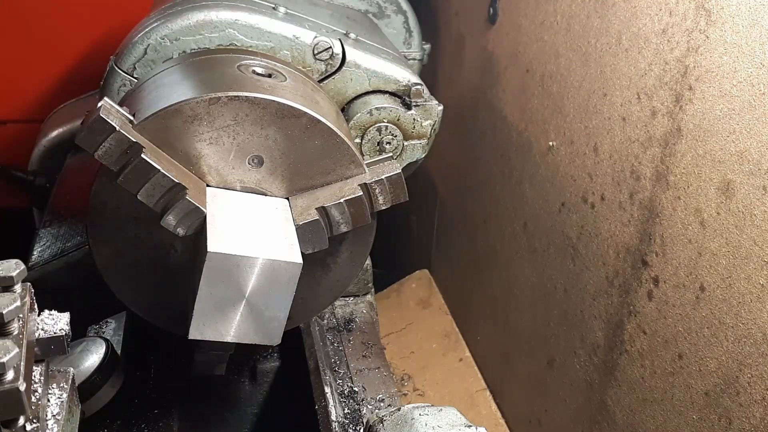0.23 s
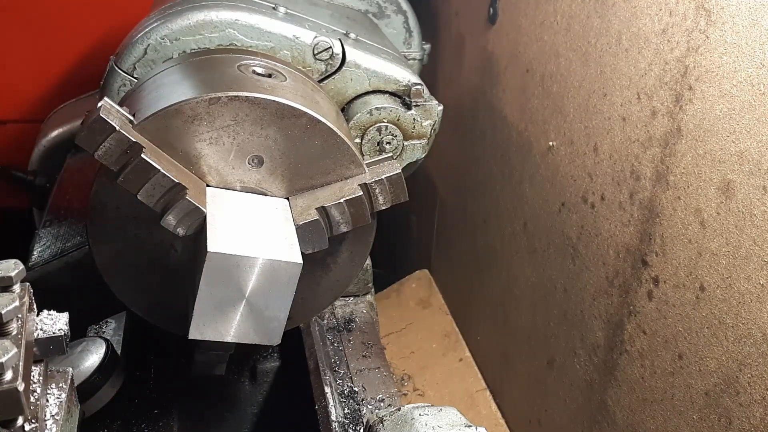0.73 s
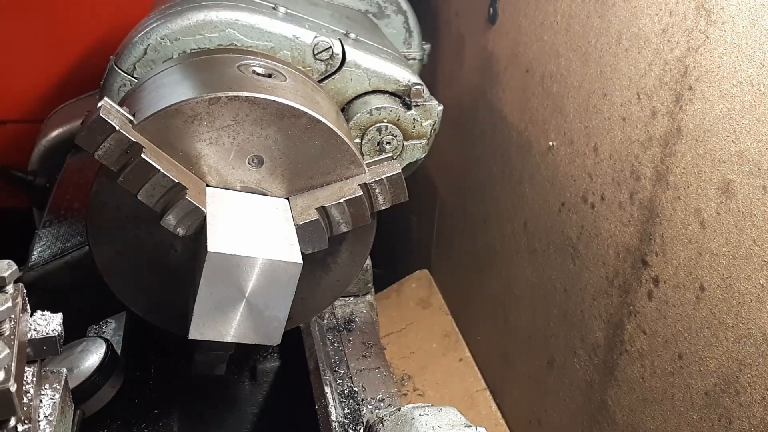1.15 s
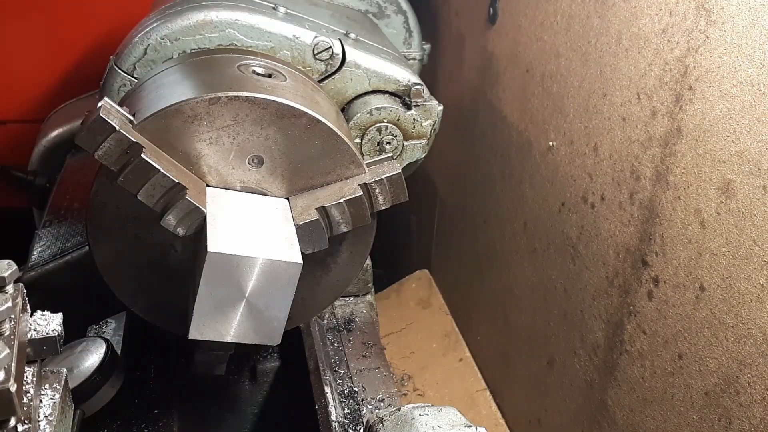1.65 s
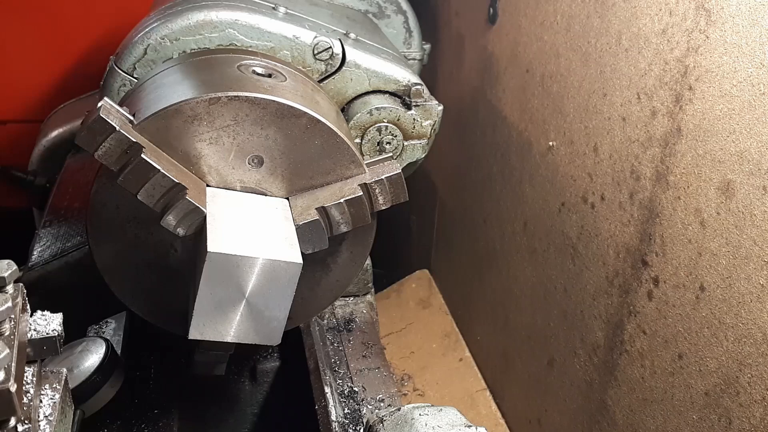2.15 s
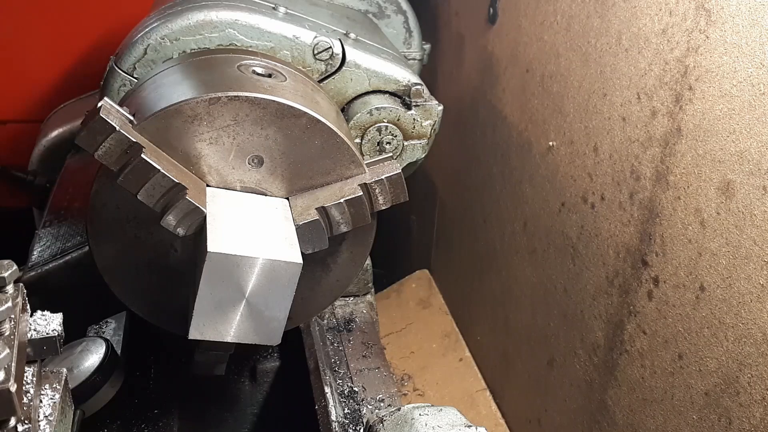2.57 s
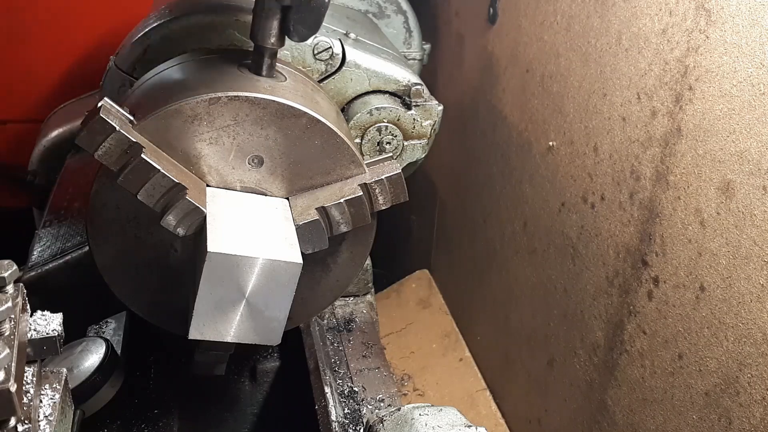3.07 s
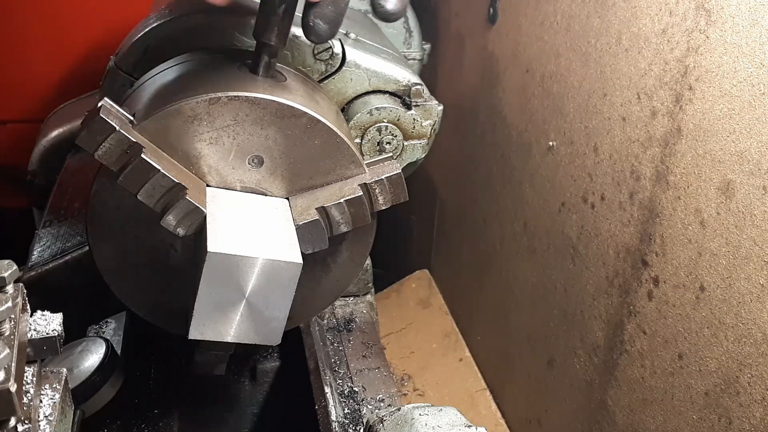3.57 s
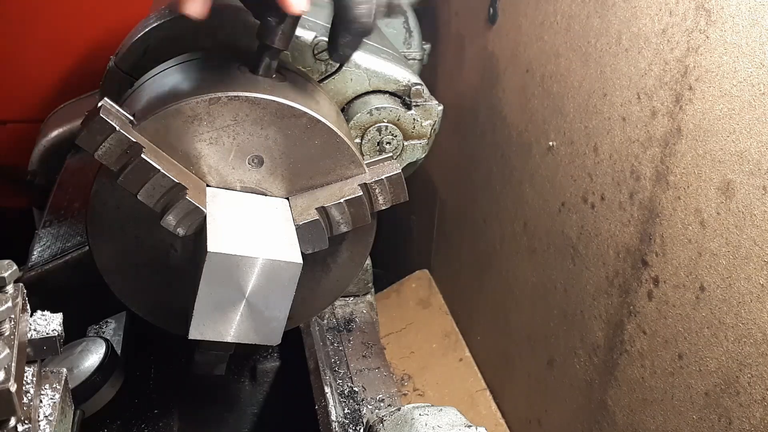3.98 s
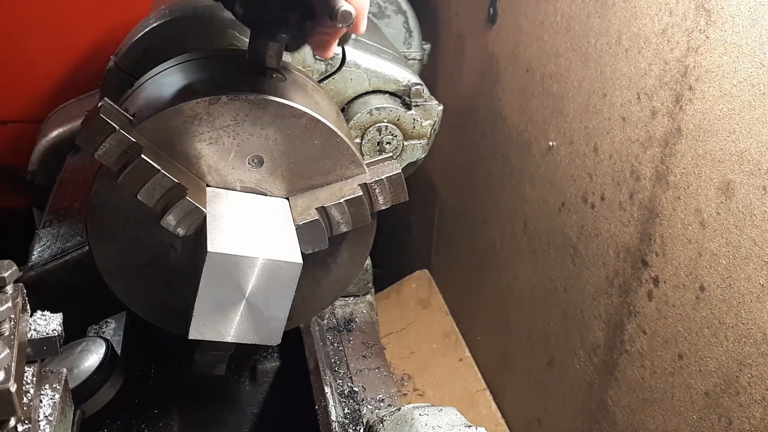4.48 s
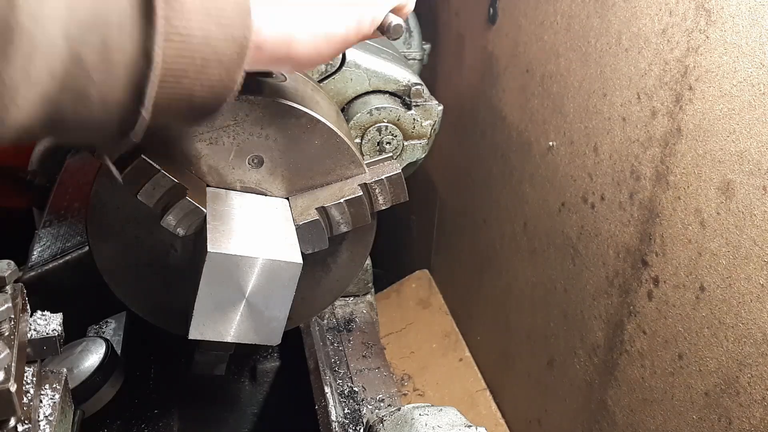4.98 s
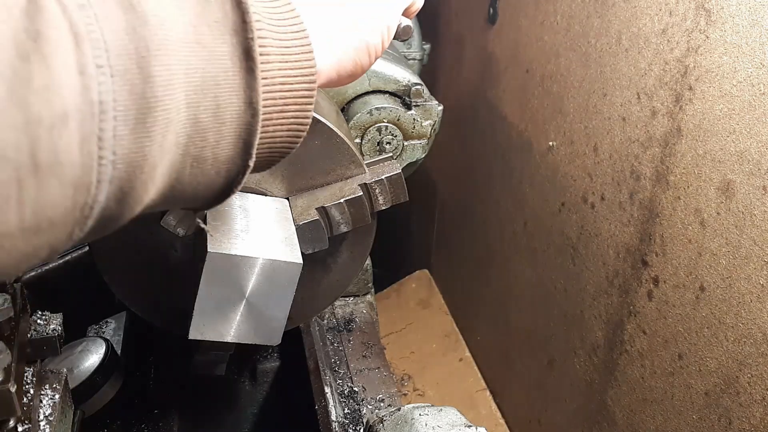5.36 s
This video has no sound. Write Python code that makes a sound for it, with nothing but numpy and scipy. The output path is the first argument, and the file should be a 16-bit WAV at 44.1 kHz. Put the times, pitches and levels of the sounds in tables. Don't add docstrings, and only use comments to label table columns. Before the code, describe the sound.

Close stereo pickup in a small, dry workshop with very faint hum. Soft sleeve rustles come first, then a light tray knock and brief gritty drag, and a much louder woody bench knock. A steel key clanks into a lathe chuck with quick bright bounces; after quiet handling, it is wrenched with a sharp ringing crack and heavy thump. Faint rubbing and small bumps close the scene.

```python
import sys
import numpy as np
from scipy import signal
from scipy.fft import rfft, irfft
from scipy.io import wavfile
from scipy.ndimage import uniform_filter1d

SR = 44100
rng = np.random.default_rng(int(sys.argv[2]) if len(sys.argv) > 2 else 0)


def file_out(sig):
    cols = np.atleast_2d(sig).T
    lim = np.clip(cols, -1, 1)
    pcm = np.round(lim * 32767).astype(np.int16)
    wavfile.write(sys.argv[1], SR, pcm)


def decibels_to_gain(level_db):
    exponent = np.asarray(level_db, float) / 20
    return 10 ** exponent


N = 248283

# start in seconds, peak in dB, chatter in seconds, board or tray ring in dB,
# left-right in dB.
KNOCKS = [
    (1.142, -20.5, 0.01, -7, 0),
    (2.1198, -7, 0.0092, -14, 1),
]
# start in seconds, peak in dB, chatter in seconds, bed thump in dB,
# left-right in dB.
CLANKS = [
    (2.85, -10, 0.0075, -7, 3),
    (2.9214, -13, 0.0018, -17, 6.5),
    (2.9323, -15, 0.0036, -10.5, -1.5),
    (4.334, -8, 0.012, -6, 3),
    (4.402, -19, 0.003, -9.5, 0),
]
# frequency in Hz, level in dB per Hz.
KNOCK_COLOURS = [
    [(71, -52.5), (120, -62), (173, 4), (393, -1), (503, 0), (605, -10), (1160, -23), (1550, -20),
     (2430, -6), (3900, -30.5), (6240, -20), (7500, -39), (16000, -51.5)],
    [(71, -42.5), (120, -19), (246, -3.5), (370, -4.5), (605, -7), (757, -1), (1620, -10), (2340, -3),
     (2930, -5.5), (3240, -3.5), (4880, -8), (7050, -51), (16000, -35)],
]
# frequency in Hz, level in dB per Hz.
CLANK_COLOURS = [
    [(260, -27.5), (450, -24), (656, -31), (1200, -6.5), (1410, -9), (3140, -10.5), (3440, -10), (4870, -8),
     (7650, -24.5), (15100, -23), (16500, -46.5)],
    [(260, -35), (450, -3.5), (1750, -4), (3340, 5.5), (3820, -6.5), (6200, 2), (6780, -23.5),
     (11700, -11.5), (15500, -38.5), (16500, -58)],
    [(260, -33), (450, 8), (1080, -27), (1700, 2.5), (2700, 0.5), (3820, -46), (4250, -24.5), (8250, -18),
     (8890, -28), (15300, -12), (16500, -12.5)],
    [(260, -36.5), (450, -20), (763, -7), (1050, -16), (1220, -7), (2550, -12), (3290, -6), (4250, -5),
     (4650, -2.5), (7540, -25), (8500, -21), (15300, -22), (16500, -43.5)],
    [(590, -57), (1000, -9), (1290, -2), (2380, -2), (2680, -3), (2840, 1), (4130, 13), (7430, -9),
     (14800, -9.5), (16500, -26)],
]
# first reflections in dB, extra damping in dB per second.
PLACES = [(5.5, -21.5), (3, -10.5), (-5.5, 165), (-9.5, 157), (4.5, 60), (-6.5, 69), (9.5, 55)]
# mode in Hz, level in dB, T60 in seconds.
TRAY = [(180, -3, .18), (243.6, 0, .3), (315, -2.5, .17), (403, -10.5, .15), (442, -8.5, 0.16),
        (478, -8, .15), (542, -6.5, .13), (672, -16, 0.124), (1018, -7, .14), (1128, -10, .11),
        (1240, -7, .13), (1280, -10, .12), (1920, -13, .08), (2390, -21.5, .12)]
# mode in Hz, level in dB, T60 in seconds.
BOARD = [(172, -2, .23), (240, 2.5, .3), (256, 1.5, 0.31), (291, -8.5, 0.13), (446, -5.5, .17),
         (669, -5, 0.17), (742, -3.5, .14), (772, -5, .13), (820, -8, .12), (865, -9, .11), (912, -8, .11),
         (1078, -7.5, .15), (2126, -14.5, .07), (3249, -3, .1)]
# length in seconds, then level in dB.
RATTLE_S = (.03, .012)
RATTLE_DB = (-15, -17.5)
# mode in Hz, level in dB, T60 in seconds, time to swell in seconds.
BED = [(105, -12.5, 0.45, 0.0046), (127.7, -18, .25, .005), (150.8, -8.5, .33, .003),
       (175.7, -10, 0.39, 0.0053), (234, -3.5, .3, .01), (249.6, -3.5, .3, 0.011), (290.7, -2, .25, .012),
       (343.9, 1, .2, .012), (384.8, -6, 0.094, .008), (435.3, -5, 0.2, .008)]
# centre in Hz, slowness of the answer as a factor.
BED_SPOTS = [(260, 1.3), (280, 0.8), (270, 1.3), (270, 1.3), (257, 0.98)]
# mode in Hz, T60 in seconds.
KEY = [(3370, .14), (4253, .09), (4705, .18), (4764, .07), (5100, .07), (6971, .055), (8538, .11),
       (9130, .08), (11280, .06), (11780, .08), (12650, .06)]
KEY_END_DB = [-15.5, -27, -22, -25, -24.5, -36, -28.5, -38, -30.5, -41, -39.5]
KEY_SIDE_DB = [-38, -25, -45.5, -34, -33.5, -34.5, -55, -35.5, -45.5, -47.5, -47.5]
KEY_LOAD_DB = [-22.5, -34, -10, -23, -29.5, -35.5, -23.5, -43.5, -24, -39, -37.5]
# ring in dB, hardness in dB per octave, side share 0-1, load share 0-1,
# share of the free ring time.
STRIKES = [
    (4.5, -6.5, 0.04, 0.05, 0.9),
    (1.5, -10, 0.9, 0, 0.97),
    (9, 2, .95, 0, 0.55),
    (-5, 7.5, 0.25, .95, 1),
    (-22, -16, 0.85, 0.15, 0.87),
]
JOLTS_DB = [-46, -51.5, -52, -42.5, -56]
CHUCK_DB = [-34, -41, -45, -29, -42]
# mode in Hz, level in dB, T60 in seconds.
STAND = [(30, -16.5, .12), (62, -8.5, .12), (98, 1, 0.32)]
CHUCK = [(428, -2.5, 0.2), (655, -8.5, 0.21), (764, -1.5, 0.18), (776, -8, .12), (875, -10, .15),
         (980, -8.5, 0.089), (1134, -5, 0.12), (1239, -3.5, .18), (1468, -5.5, .18), (1504, -9, .15),
         (1743, -5, .17), (1864, -4.5, .16), (2115, -5.5, .16), (2240, -8.5, .14)]
# start in seconds, peak in dB, centre in Hz,
# width in octaves, chatter in seconds.
SNAPS = [(1.1436, -29, 2170, 0.4, 0.0025), (1.274, -48, 3800, 0.52, 0.0023),
         (1.3101, -40, 2560, .8, 0.0022), (2.1215, -12, 2100, .5, .0015), (2.1215, -21, 806, .6, .0015),
         (4.3335, -10.5, 1800, 0.43, 0.0012), (4.339, -13.5, 1990, .5, .002),
         (2.9306, -22.5, 1600, 0.57, .002), (1.32, -43, 2440, .5, .002), (4.292, -48, 768, .25, .008),
         (4.8632, -48, 4200, 1.2, .002)]
# start in seconds, peak # in dB,
# centre in Hz, width in octaves, chatter in seconds.
MORE_TICKS = [(1.175, -32.5, 1120, 0.86, 0.0096), (1.201, -40.5, 1100, 0.75, 0.0074),
              (1.272, -55, 4004, .4, 0.0033), (1.3198, -56, 2800, 0.52, 0.0052),
              (2.131, -16.5, 1110, 1.4, 0.0044), (2.915, -23, 2994, .9, 0.0053),
              (2.935, -16.5, 4470, .6, 0.0019), (4.345, -12.5, 5190, .8, 0.0028), (5.467, -60, 5500, 0.53, .01),
              (1.445, -50, 2840, .6, .004), (1.3438, -46, 3720, .6, .003), (2.145, -21.5, 900, .6, .002),
              (2.155, -32, 900, .5, .003), (4.649, -58.5, 4000, .8, .003), (4.657, -60, 1160, .5, .004),
              (5.054, -56, 5700, .7, .003), (4.7, -57, 3460, .9, .004), (4.76, -53, 2800, .9, .004),
              (5.5, -43, 450, 0.66, .012), (5.575, -50.5, 480, .6, .01), (4.404, -29, 750, 0.83, 0.0043),
              (5.57, -44, 1580, 0.42, .003)]
# start in seconds, peak in dB, centre in Hz, width in octaves, chatter in seconds.
TICKS = [(0.6054, -52.5, 3720, 2.9, 0.028), (1.111, -45.5, 2850, 0.32, 0.0093),
         (1.29, -61, 4000, 0.64, 0.0049), (1.3105, -47.5, 2150, 0.77, 0.021),
         (1.3593, -44, 2390, 1.1, 0.0039), (2.034, -58.5, 2570, 0.51, 0.0073),
         (2.4536, -59, 5440, 0.63, 0.0053), (4.2863, -57, 4400, 0.81, 0.0077),
         (4.5288, -41, 4600, 1.8, 0.0016), (4.8625, -48, 4060, 3.9, 0.0039),
         (4.9583, -46, 2196, 0.31, 0.012), (5.1864, -59.5, 4600, 2.2, 0.0025),
         (5.5076, -37.5, 3930, 0.89, 0.0034), (5.5776, -40.5, 2850, 2.9, 0.0032),
         (1.342, -42.5, 490, 0.45, 0.0078), (2.912, -36.5, 3950, 2.2, 0.016),
         (4.3305, -31.5, 5000, 1.1, .004)]
# first reflections in dB, extra damping in dB per second.
TOUCH_PLACE = (6.6, 40)
SNAP_PLACE = (8, 550)
# frequency in Hz, gain in dB.
PORT_DIP = [(100, 1), (5800, 0), (7500, -17.5), (9000, -10.5), (15000, -6)]
# start in seconds, peak in dB, push in seconds, centre in Hz.
THUMPS = [(4.029, -55, 0.0084, 256), (4.083, -47, 0.016, 256), (4.291, -34.5, 0.011, 264),
          (4.306, -31.5, 0.005, 230), (4.735, -43.5, 0.0052, 228), (4.872, -44, 0.023, 229),
          (5.002, -57, 0.0096, 152.7), (5.495, -35.5, 0.0051, 118), (5.52, -45, 0.014, 147),
          (5.569, -62, 0.016, 234)]
# time in seconds, level in dB.
DRAG = [(1.187, -70), (1.266, -65), (1.276, -59), (1.304, -63), (1.312, -59), (1.336, -48.5), (1.366, -44),
        (1.44, -62), (1.455, -57), (1.572, -80.5)]
# frequency in Hz, level in dB per Hz.
DRAG_COLOUR = [(180, -41), (300, -8.5), (441, -10), (567, -41), (730, -25), (863, -20), (1690, -13.5),
               (2360, 0), (3360, -4), (3970, -0.5), (7380, -22), (15200, -24), (16500, -40.5)]
# mode in Hz, level in dB, T60 in seconds.
DRAG_MODES = [(2180, -4, 0.018), (2510, -6, 0.014), (3800, -33.5, 0.028), (4130, -14.5, 0.04)]
# start in
# seconds, level in dB, hold in seconds, brightness in dB.
STROKES = [(0.035, -82.5, 5.2, 5), (0.417, -62.5, 0.014, 5), (0.625, -60, 0.004, -0.5),
           (0.752, -68, 0.056, -3.5), (0.912, -65, 0.08, -2), (1.006, -62.5, 0.027, 0.5),
           (1.136, -64, 0.011, -1.5), (1.636, -71.5, 0.053, 1.5), (1.781, -62.5, 0.0042, 3),
           (2.13, -70.5, 0.2, 0), (2.445, -74, 0.047, 4), (2.9, -63.5, 0.15, -2), (3.157, -65, 0.064, 3.5),
           (3.377, -75.5, 0.46, 0.5), (3.737, -71.5, 0.042, 0), (3.987, -65.5, 0.04, 2),
           (4.062, -70, 0.054, 5.5), (4.316, -63, 0.15, -3.5), (4.537, -63, 0.0079, 2.5),
           (4.674, -60.5, 0.12, -1), (4.865, -64.5, 0.047, 6.5), (5.044, -68.5, 0.024, -1.5),
           (5.513, -57, 0.003, -3), (5.573, -59.5, 0.043, 2.5)]
# start in
# seconds, level in dB, hold in seconds.
LEANS = [(0.036, -83, 10), (0.605, -64, 0.026), (0.744, -72.5, 0.18), (0.955, -64, 0.088),
         (1.117, -61, .02), (1.768, -81, .01), (2.12, -70, 0.15), (2.49, -86, 0.018), (2.886, -59, 0.19),
         (3.15, -76.5, 0.11), (3.473, -71, 0.054), (4.012, -65, 0.058), (4.082, -61, 0.032),
         (4.297, -56, 0.24), (4.734, -62, 0.11), (4.873, -48, 0.0066), (5.001, -61.5, .01),
         (5.501, -47, 0.038)]
RUB_EDGES_HZ = [180, 640, 1800, 7200, 17000]
# frequency in Hz, level in dB per Hz.
BENCH_RUB_COLOUR = [(88, -31), (150, 8.5), (190, -4), (451, -6), (618, -16), (953, -24.5), (1620, -17.5),
                    (2310, -10), (2650, -13), (5480, -10.5), (6420, -13.5), (7510, -34.5), (12500, -26.5),
                    (15300, -17), (16500, -34)]
LATHE_RUB_COLOUR = [(88, -34), (150, 8.5), (194, -14), (245, -5.5), (378, -13.5), (508, -20), (618, -30),
                    (783, -31), (972, -37), (1180, -28), (1690, -29.5), (5170, -22), (7660, -33),
                    (15300, -17.5), (16500, -32)]
# start in seconds, length in seconds, start pitch in Hz, level in dB.
SLIPS = [
    (2.478, 0.076, 2226, -77),
    (2.576, 0.082, 2150, -78.5),
]
# start in
# seconds, level in dB, hold in seconds.
STEPS = [(.05, -72.5, 3.1), (.4, -57, 0.06), (1.0, -60, 0.48), (1.9, -64.5, .01), (2.07, -66, 0.33),
         (2.72, -66, .01), (4.1, -66.5, .1), (4.6, -55.5, .3), (5.522, -36.5, 0.026)]
# frequency in Hz, level in dB per Hz.
HUM = [(12, -50.5), (20, -31), (40, -19.5), (60, -6), (85, -4), (124, -3), (156, -9.5), (174, -20),
       (206, -27), (224, -32), (382, -31.5), (428, -24.5), (729, -35), (794, -30), (1400, -32.5),
       (2310, -34.5), (3500, -39.5), (11800, -37), (16500, -42)]
# frequency in Hz, left-right likeness from -1 to 1.
LIKENESS = [(60, 0.98), (180, 0.82), (550, 0.47), (1650, -0.14), (4970, -0.034), (15000, 0.34)]
# frequency in Hz, T60 in seconds.
SHOP_T60 = [(120, 0.22), (400, 0.32), (1500, 0.24), (4000, 0.12), (8000, 0.13), (15000, 0.08)]

KNOCK_RISE_S, CLANK_RISE_S = 0.0024, 0.00053
PORT_LAG = 6
HALF_SECOND = np.arange(SR // 2) / SR


def blows(room):
    out = np.zeros((2, N))
    colours = KNOCK_COLOURS + CLANK_COLOURS
    for k, (s, db, length, body_db, pan_db) in enumerate(KNOCKS + CLANKS):
        knock = k < len(KNOCKS)
        rise = KNOCK_RISE_S if knock else CLANK_RISE_S
        hits = chatter(rise, length, spread_db=3.0, first_db=30.0)
        crack = colour(in_room(hits, placed(room, *PLACES[k])), colours[k], even=True)
        crack = peak_one(high(crack, hz=141))
        if knock:
            body = bench(k, rise, room)
        else:
            centre_hz, slowness = BED_SPOTS[k - len(KNOCKS)]
            body = bed(slowness, centre_hz)
        add(out, s, decibels_to_gain(db) * (crack * left_right(pan_db) + decibels_to_gain(body_db) * body))
    return out


def bench(k, rise, room):
    tap = decibels_to_gain(RATTLE_DB[k] - 20) * chatter(rise, RATTLE_S[k], spread_db=5.5, first_db=0.0)
    tap[round(rise * SR)] = 1
    ringing = high(ring_all(tap, (TRAY, BOARD)[k]), hz=144)
    return peak_one(ringing + decibels_to_gain(-8) * in_room(ringing, room))


def bed(slowness, centre_hz):
    t, modes = HALF_SECOND, 0
    draw = rng.uniform(-1, 1, (len(BED), 4))
    for (hz, db, t60, swell_s), (d, p, q, twin) in zip(BED, draw):
        level = db + 4.7 * d - 8.9 * np.log2(hz / centre_hz) ** 2
        envelope = decibels_to_gain(level - 60 * t / t60) * (1 - np.exp(-t / max(swell_s * slowness, 5e-4))) ** 2
        tone = np.sin(2 * np.pi * hz * t + 3 * p)
        twin_tone = np.sin(2 * np.pi * hz * (1 + 0.07 * twin) * t + 3 * q)
        modes = modes + envelope * (tone + 0.72 * np.exp(-5.0 * t) * twin_tone)
    after_ring = 0.52
    modes = modes * (after_ring + (1 - after_ring) * np.exp(-(t / 0.038) ** 2 / 2))
    return peak_one(np.array([modes, np.roll(modes, 2 * PORT_LAG)]))


def key(room):
    out, t = np.zeros((2, N)), HALF_SECOND
    starts, beats = 2 * np.pi * rng.random((2, len(CLANKS), len(KEY)))
    octaves = np.log2(np.array(KEY)[:, 0] / KEY[0][0])
    for (s, *_), (ring_db, hard_db, side, load, free), start, beat in zip(CLANKS, STRIKES, starts, beats):
        levels = ring_db + hard_db * octaves + KEY_END_DB
        levels += side * np.subtract(KEY_SIDE_DB, KEY_END_DB)
        levels += load * np.subtract(KEY_LOAD_DB, KEY_END_DB)
        modes = 0
        for (hz, t60), db, p, b in zip(KEY, levels, start, beat):
            waver = 1 + 0.3 * np.sin((250 + 60 * b) * t + p)
            port_phase = np.sign(b - np.pi) * np.pi / 2 * np.array([[0], [1]])
            tone = np.sin(2 * np.pi * hz * t + p + port_phase)
            modes = modes + decibels_to_gain(db - 60 * t / t60 / free) * waver * tone
        modes = modes * (1 - np.exp(-t / 0.0014))
        add(out, s + CLANK_RISE_S, modes + decibels_to_gain(-58.5) * in_room(modes[0], room))
    return out


def jolts():
    clicks = np.zeros((2, N))
    clicks[:, (np.array(CLANKS)[:, 0] * SR).astype(int)] = decibels_to_gain(np.array([JOLTS_DB, CHUCK_DB]))
    push = ring(clicks[0], 54.0, 0.013) / 40
    out = ring_all(push, STAND) * left_right(-3)
    for hz, db, t60 in CHUCK:
        mode = decibels_to_gain(db) * ring(clicks[1], hz, t60)
        out = out + np.array([mode, np.roll(mode, round(SR / hz / 4))])
    return out


def touches(room, table, place, skirt_db=-28.5):
    out, room = np.zeros((2, N)), placed(room, *place)
    for s, db, hz, width, length in table:
        hump = [(hz / 16, -45), (hz / 2 ** width, -12), (hz, 0), (hz * 2 ** width, -12), (hz * 16, skirt_db)]
        touch = in_room(chatter(0.00081, length, spread_db=6.5, first_db=35.5), room)
        touch = colour(touch, hump, even=True)
        add(out, s, decibels_to_gain(db) * peak_one(colour(touch, PORT_DIP)))
    return out


def thumps():
    out = np.zeros((2, N))
    for s, db, push_s, hz in THUMPS:
        add(out, s, decibels_to_gain(db) * bed(push_s / 0.016, hz))
    return out


def drag(room):
    s, db = np.transpose(DRAG)
    t, draw = s[0] + HALF_SECOND, rng.random((3, SR // 2))
    grains_per_s = 600.0 * decibels_to_gain(7.0 * drift(30)[:SR // 2])
    sizes = decibels_to_gain(-4.5 * np.log(draw[1] + 0.00077)) * np.sign(draw[2] - 0.5)
    grains = colour(((draw[0] < grains_per_s / SR) * sizes)[None], DRAG_COLOUR)[0]
    grains = grains + ring_all(grains, DRAG_MODES) * decibels_to_gain(-31.5)
    grit = in_room(grains, room)
    grit = rms_one(grit / np.sqrt(uniform_filter1d(grit ** 2, size=4000) + 1e-12))
    out = np.zeros((2, N))
    add(out, s[0], decibels_to_gain(np.interp(t, s, db, -140, -140) + 4.0) * grit)
    return out


def cloth():
    s, db, hold, bright = np.transpose(STROKES)
    lean_s, lean_db, lean_hold = np.transpose(LEANS)
    lean_attack_s = 0.054 * decibels_to_gain(-0.42 * (lean_db + 68))
    stroke_attack_s = 0.068 * decibels_to_gain(-0.15 * (db + 69.0))
    levels = [swells(lean_s, lean_db, lean_hold, lean_attack_s, fall_db_per_s=214)]
    for shift_db in (-8.5 - 0.96 * bright, 0, -5.5 + bright):
        levels.append(swells(s, db + shift_db, hold, stroke_attack_s, fall_db_per_s=145))
    ranges, grip = [0, 0, 0, 0], drift(28)
    for hz, band in bands(size=N):
        k = np.searchsorted(RUB_EDGES_HZ, hz) - 1
        if 0 <= k < 4:
            ranges[k] = ranges[k] + decibels_to_gain(0.8 * grip + 1.8 * drift(18)) * band
    rubbing, at_lathe = 0, round(2.2 * SR)
    for level, noise in zip(levels, ranges):
        at_bench = rms_one(colour(noise[:, :at_lathe], BENCH_RUB_COLOUR))
        later = rms_one(colour(noise[:, at_lathe:], LATHE_RUB_COLOUR))
        rubbing = rubbing + level * np.hstack([at_bench, later])
    return decibels_to_gain(2.5 + 1.5 * drift(210)) * rubbing


def squeak():
    t, waver, out = np.arange(N) / SR, 1 + 0.009 * drift(37), 0
    for s, length, hz, db in SLIPS:
        arc = np.sin(np.pi * np.clip((t - s) / length, 0, 1))
        pitch = (hz - 1100 * np.clip(t - s, 0, length) + 50 * arc) * waver
        envelope = np.abs(arc) ** 0.26 * (t > s) * (t < s + length)
        out = out + decibels_to_gain(db) * envelope * np.sin(2 * np.pi * np.cumsum(pitch) / SR)
    return out


def rumble():
    band = signal.butter(2, [95, 170], "band", fs=SR, output="sos")
    low = signal.sosfilt(band, rng.standard_normal(N))
    level = swells(*np.transpose(STEPS), attack_s=0.029, fall_db_per_s=98)
    return decibels_to_gain(-7.5) * level * rms_one(low)


def hum():
    white = sum(band for _, band in bands(size=N))
    return decibels_to_gain(-69.5 + 2.0) * rms_one(colour(white, HUM))


def shop():
    t, tail = HALF_SECOND, 0
    for hz, band in bands(size=SR // 2):
        t60 = at_hz(SHOP_T60, hz)
        tail = tail + band * decibels_to_gain(-60 * t / t60) / np.sqrt(t60)
    tail *= (1 - np.exp(-t / 0.00082)) * (1 + decibels_to_gain(7) * np.exp(-t / 0.03))
    tail /= np.sqrt((tail ** 2).sum() / 2)
    tail[0, PORT_LAG] = tail[1, 0] = decibels_to_gain(-11)
    return colour(tail, [(20, 0), (20000, 0)], even=True)


def placed(room, near_db, damping_db):
    t = HALF_SECOND
    return room * (1 + decibels_to_gain(near_db) * np.exp(-t / 0.0085)) * decibels_to_gain(-damping_db * t)


def in_room(x, room):
    return signal.fftconvolve(x[None], room, axes=1)[:, :SR // 2]


def chatter(rise, length, spread_db, first_db):
    t, draw = HALF_SECOND, rng.random((2, SR // 2))
    sizes = decibels_to_gain(-spread_db * np.log(draw[0] + 0.001)) * np.sign(draw[1] - 0.5)
    sizes *= (1 - np.exp(-t / max(rise, 1e-4))) * np.exp(-(t / max(length, 1e-3)) ** 2)
    sizes[round(rise * SR)] = decibels_to_gain(first_db)
    return sizes


def ring(x, hz, t60):
    r, w = decibels_to_gain(-60 / (max(t60, 0.01) * SR)), 2 * np.pi * hz / SR
    return signal.lfilter([0, np.sin(w)], [1, -2 * r * np.cos(w), r * r], x + 1e-18)


def ring_all(x, modes):
    return sum(decibels_to_gain(db) * ring(x, hz, t60) for hz, db, t60 in modes)


def swells(s, db, hold, attack_s, fall_db_per_s):
    t = np.arange(0, N + 64, 64)[:, None] / SR
    rise = np.clip(1 + (t - s) / attack_s, 0, 1) ** 2
    fall = decibels_to_gain(db - np.maximum(t - s - np.maximum(hold, 0), 0) * fall_db_per_s)
    return np.interp(np.arange(N) / SR, t[:, 0], np.sqrt(((rise * fall) ** 2).sum(axis=1)))


def drift(rate):
    r = np.exp(-80 * np.pi * rate / SR)
    slow = signal.lfilter([1], [1, -2 * r, r * r], rng.standard_normal(N // 40 + 2002))[2000:]
    return np.interp(np.arange(N) / 40, np.arange(len(slow)), rms_one(slow))


def bands(size):
    white = rng.standard_normal((2, 2, size + 4000))
    edges = 20 * 2 ** np.arange(0, 10.1, 0.5)
    for k, (low, high_edge) in enumerate(zip(edges, edges[1:])):
        band = signal.butter(2, [low, high_edge], "band", fs=SR, output="sos")
        mid, side = signal.sosfilt(band, white[k % 2])[:, 4000:]
        hz = np.sqrt(low * high_edge)
        alike = np.clip(at_hz(LIKENESS, hz), -1, 1)
        yield hz, np.sqrt(1 + alike) * mid + np.sqrt(1 - alike) * side * [[1], [-1]]


def colour(x, spectrum, even=False):
    hz = np.arange(1, 2050) * SR / 4096
    gain = decibels_to_gain(at_hz(spectrum, hz))
    if even:
        power = uniform_filter1d(np.abs(rfft(x.mean(axis=0))) ** 2, size=44)
        gain /= np.sqrt(np.interp(hz, np.arange(len(power)) * SR / x.shape[1], power) + 1e-12)
    cep = irfft(np.log(gain))
    cep[1:2048], cep[2049:] = 2 * cep[1:2048], 0
    return signal.fftconvolve(x, irfft(np.exp(rfft(cep)))[None], axes=1)[:, :x.shape[1]]


def high(x, hz):
    return signal.sosfilt(signal.butter(4, hz, "high", fs=SR, output="sos"), x)


def at_hz(points, hz):
    points = np.array(points)
    return np.interp(np.log(hz), np.log(points[:, 0]), points[:, 1])


def left_right(db):
    return decibels_to_gain(np.array([[db], [-db]]) / 2)


def rms_one(x):
    return x / np.sqrt(np.mean(x ** 2) + 1e-20)


def peak_one(x):
    return x / np.abs(x.mean(axis=0)).max()


def add(out, s, x):
    i = round(s * SR)
    out[:, i:i + x.shape[-1]] += x[..., :N - i]


def scene():
    room = shop()
    steel = blows(room) + key(room) + jolts()
    small = touches(room, TICKS, TOUCH_PLACE) + touches(room, MORE_TICKS, TOUCH_PLACE)
    snaps = touches(room, SNAPS, SNAP_PLACE, skirt_db=-43.5)
    handling = thumps() + drag(room) + cloth()
    return steel + small + snaps + handling + squeak() + rumble() + hum()


def band_limit(x):
    return signal.sosfilt(signal.butter(12, 16820, fs=SR, output="sos"), x)


def record(dry):
    top_cut = signal.cheby2(12, 60, 16900, fs=SR, output="sos")
    mix = signal.sosfilt(top_cut, np.tanh(dry))
    return band_limit(mix)


dry = scene()
out = record(dry)
file_out(out)
```